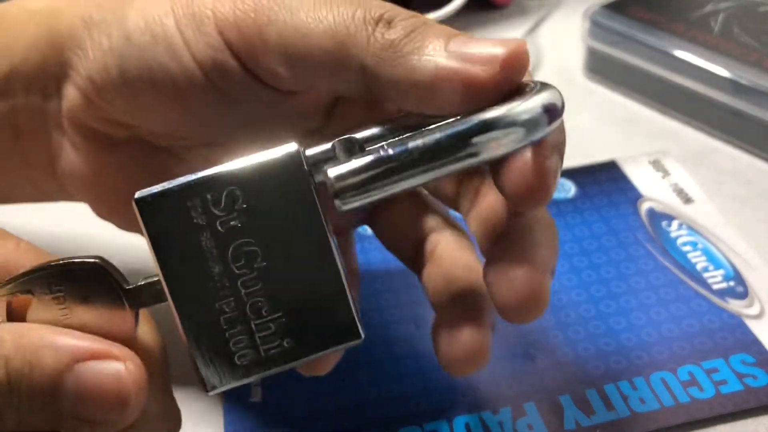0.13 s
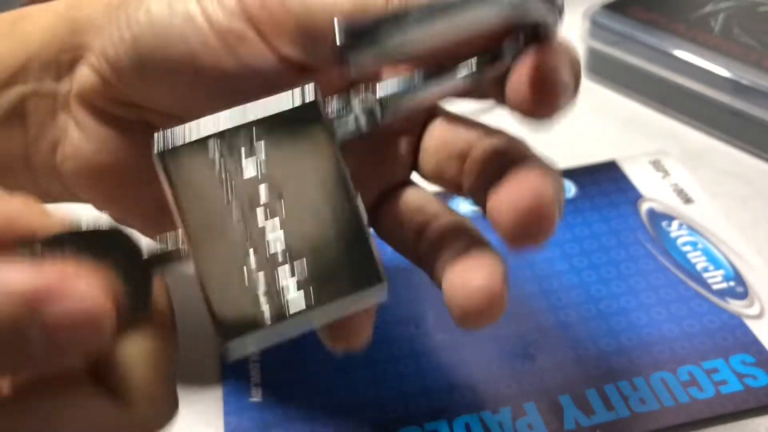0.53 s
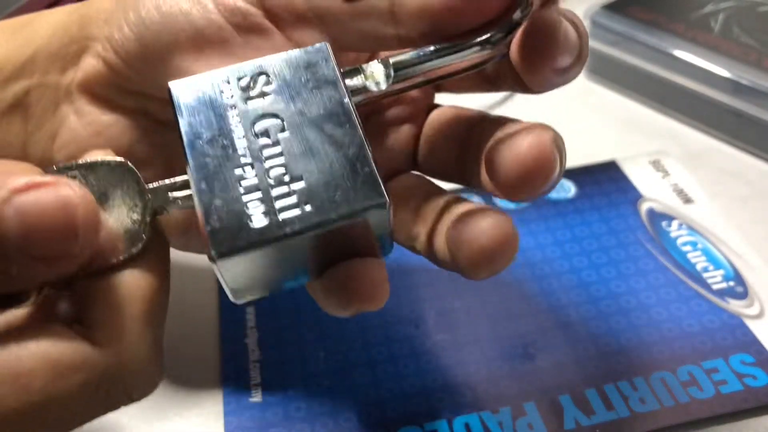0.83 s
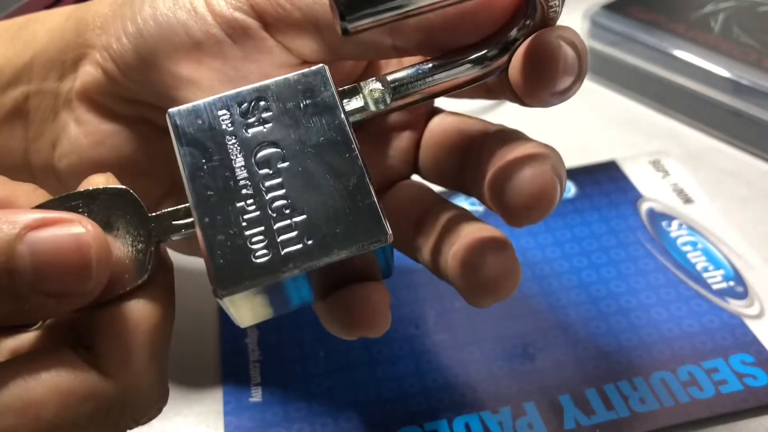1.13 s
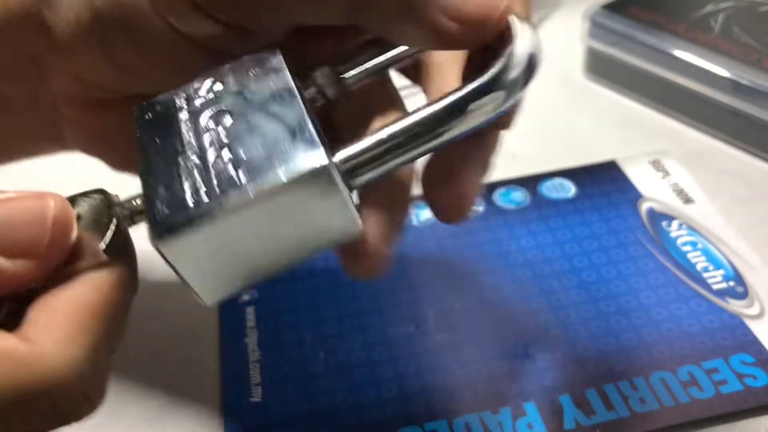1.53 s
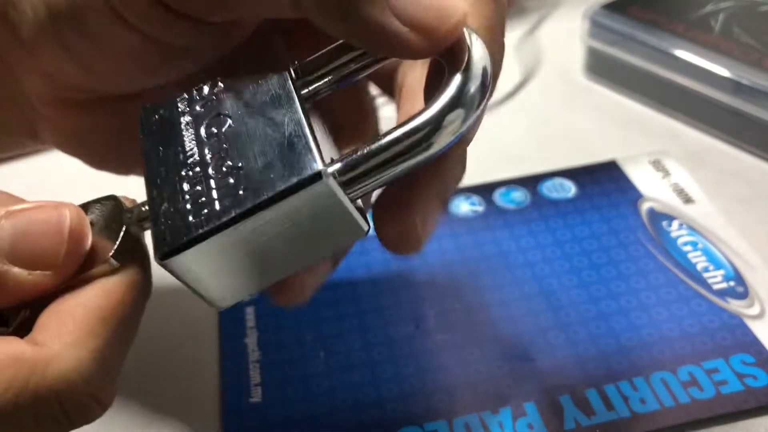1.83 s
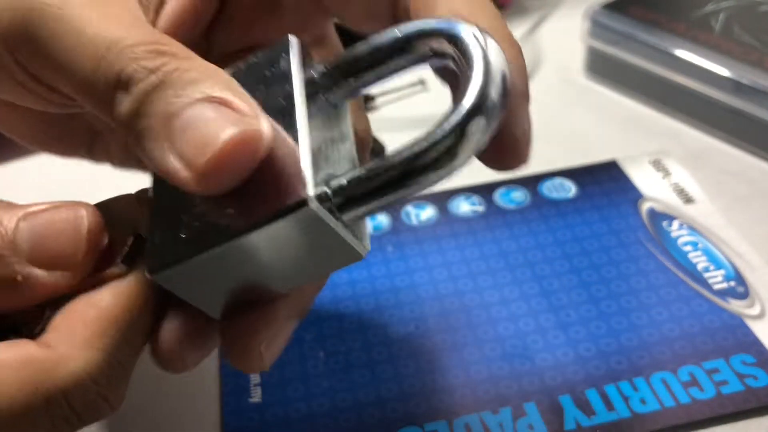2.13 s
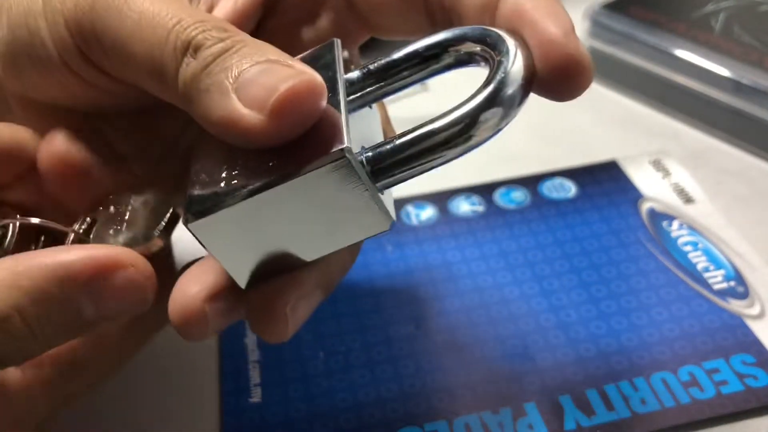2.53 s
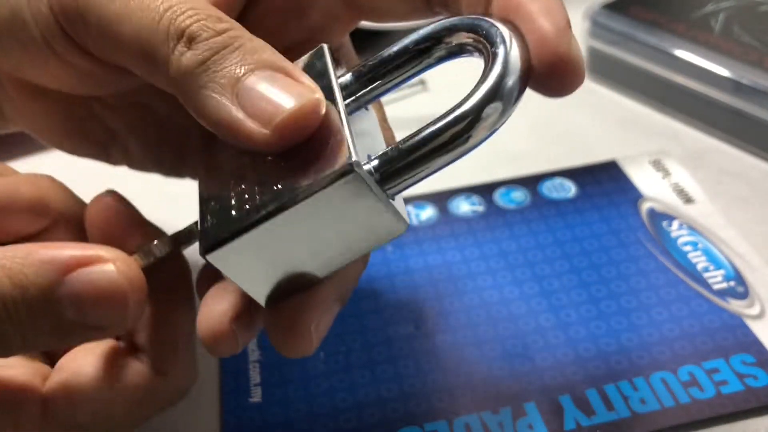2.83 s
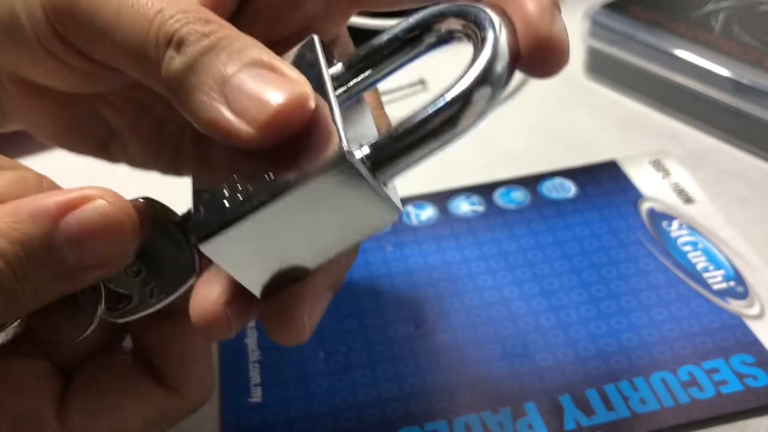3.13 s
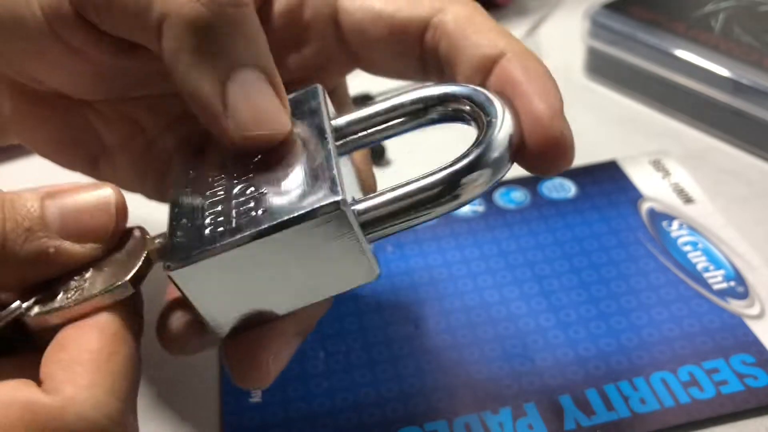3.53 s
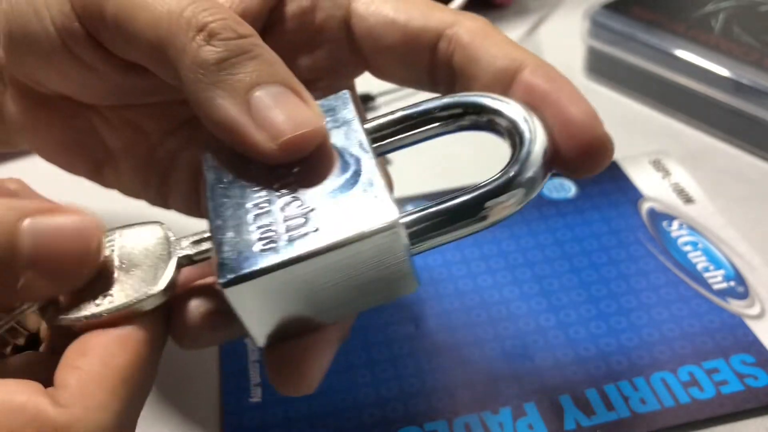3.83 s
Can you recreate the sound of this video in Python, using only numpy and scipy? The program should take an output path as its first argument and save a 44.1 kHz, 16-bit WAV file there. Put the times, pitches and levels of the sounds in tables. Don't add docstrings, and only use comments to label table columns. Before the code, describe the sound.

A steel padlock is handled close to a phone in a small, faintly reverberant room with low fan hum and soft hiss. Barely audible ticks come first; at 1.5-1.7 s the shackle snaps with loud, bright clacks. A sharp click follows at 2.2 s, thin key jingles at 2.4-2.5, a small tick at 2.8, a crisp ratcheting key slide at 3.05, then light key clicks and rattles from 3.4 to the end.

```python
import sys
import numpy as np
from scipy import signal
from scipy.io import wavfile
from scipy.ndimage import uniform_filter1d

SR = 44100
rng = np.random.default_rng(int(sys.argv[2]) if len(sys.argv) > 2 else 0)


def pcm_store(signal):
    levels = np.round(np.clip(np.atleast_2d(signal), -1, 1) * 32767)
    wavfile.write(sys.argv[1], SR, levels.astype(np.int16).T)


def makeup_ratio(level_db):
    decades = np.asarray(level_db, float) / 20
    return 10 ** decades


N = 176400


def evened(x):
    return x / np.sqrt(np.mean(x ** 2) + 1e-20)


def read(points, hz):
    f, value = np.transpose(points)
    return np.interp(np.log(hz + 1), np.log(f + 1), value)


def add(mix, start_s, sound):
    part = mix[round(start_s * SR):][:len(sound)]
    part += sound[:len(part)]


def noise(shape_db, patchy_db):
    real, imag, patches = rng.standard_normal((N // 512 + 5, 1025, 3)).T
    patches = uniform_filter1d(patches, size=16, axis=0)
    patches = evened(uniform_filter1d(patches, size=8, axis=1))
    spectra = (real + 1j * imag) * makeup_ratio(shape_db[:, None] + patchy_db * patches)
    return evened(signal.istft(spectra, nperseg=2048, noverlap=1536)[1][:N])


def air_and_hiss():
    # frequency in Hz, density in dB per Hz.
    air = [(22, -62), (55, -17.5), (96, -28.5), (135, -3), (205, -6.5), (430, -19), (1070, -20.5),
           (1650, -26)]
    # frequency in Hz, density in dB per Hz.
    hiss = [(1950, -31), (3200, -38), (5000, -46), (8000, -51), (13000, -52.5), (15700, -52.5),
            (16000, -64.5)]
    hz = np.fft.rfftfreq(2048, 1 / SR)
    return makeup_ratio(-47.5) * noise(read(air + hiss, hz), patchy_db=1.31)


def fan_hum():
    # centre in Hz, width in Hz, level in dB.
    bands = [(63, 24, -69.5), (137.3, 11, -58.5), (198.5, 30, -56), (287.8, 27, -60.5), (973, 68, -68.5),
             (7500, 300, -86)]
    t = np.arange(N) / SR
    hum = np.zeros(N)
    for hz, width_hz, db in bands:
        pole = np.exp(-np.pi * width_hz / SR)
        slow = signal.lfilter([1], [1, -2 * pole, pole * pole], rng.standard_normal((2, N)))
        carrier = np.exp(2j * np.pi * hz * t)
        hum += makeup_ratio(db) * evened(((slow[0] + 1j * slow[1]) * carrier).real)
    return hum


def causal(db):
    log_gain = np.log(makeup_ratio(np.maximum(db, -80)))
    log_gain = np.concatenate([log_gain, log_gain[-2:0:-1]])
    spectrum = np.exp(log_gain - 1j * signal.hilbert(log_gain).imag)
    return np.fft.ifft(spectrum).real[:len(db)]


def peaked(db, sound):
    loudest = uniform_filter1d(sound ** 2, size=44).max()
    return makeup_ratio(db) * sound / np.sqrt(6 * loudest)


def chatter(ms, spread=1):
    knocks_per_ms, knock_spread_db, rise_ms = 6.47, 4, 0.45
    chance, size, sign = rng.random((3, 2048))
    t_ms = np.arange(2048) * 1000 / SR
    knocks = (chance < knocks_per_ms * 1000 / SR) * np.sign(sign - .5)
    knocks *= makeup_ratio(-spread * knock_spread_db * np.log(size + 1e-2))
    knocks[0] = 6.5
    hold = np.clip(1.1 - (t_ms / ms) ** 2, 0, 1)
    return knocks * hold * np.minimum(0.11 + t_ms / rise_ms, 1)


def tick(db, centre_hz, ms):
    width_octaves = .3 * (1 + ms / 20)
    band_hz = np.fft.rfftfreq(512, 1 / SR)
    away = np.log2((band_hz + 1) / centre_hz) / width_octaves
    return peaked(db, np.convolve(chatter(ms, spread=.6), causal(-6.0 * away ** 2)))


def body_ticks():
    # start in seconds, peak in dB, centre in Hz, length in ms.
    ticks = [(.019, -47, 4060, 19), (.37, -49.5, 3900, 3), (2.018, -44.5, 3540, 27.5),
             (2.349, -43, 4800, 3), (2.3792, -49, 4560, 3), (2.40, -46, 5100, 2.5), (2.421, -46, 4500, 2),
             (2.452, -44, 4340, 7.8), (2.547, -51, 4470, 2), (2.76, -45, 4660, 4.2),
             (2.784, -51, 4650, 3.6), (2.892, -41.5, 4540, 3.9), (1.599, -46.5, 4290, 54),
             (1.5565, -26.5, 4316, 18), (3.574, -50, 2850, 3)]
    sound = np.zeros(N)
    for start_s, *touch in ticks:
        add(sound, start_s, tick(*touch))
    return sound


def modal_ring(modes, spot_hz, free):
    spot_db, spot_octaves, spot_db_per_octave = 13, 0.045, 5
    detune, grip_spread_db = .004, 2.5
    far_ring = 0.5
    hz, level, t60 = np.transpose(modes)[:, :, None]
    t = np.arange(8192) / SR
    phase, grip, shift = rng.random((3, *hz.shape))
    away = abs(np.log2(hz / spot_hz))
    near = np.exp(-(away / spot_octaves) ** 2)
    level = level - spot_db_per_octave * away + spot_db * near - grip_spread_db * grip
    t60 = t60 * max(free, .03) * (far_ring + (1 - far_ring) * near)
    turns = hz * (1 + detune * (shift - .5)) * t + phase
    ring = (makeup_ratio(level - 60 * t / t60) * np.sin(2 * np.pi * turns)).sum(0)
    return ring * np.minimum(t / 0.00023, 1) / np.linalg.norm(makeup_ratio(level))


def impact_crack(spot_hz):
    # frequency in Hz, level in dB.
    crack_colour = [(1500, -46), (3100, -0.5), (6000, 2), (12000, -3.5), (15700, -0.5), (16600, -4)]
    t, band_hz = np.arange(1024) / SR, np.fft.rfftfreq(512, 1 / SR)
    away = abs(np.log2((band_hz + 1) / spot_hz))
    colour = read(crack_colour, band_hz) - 0.51 * 5 * away
    burst = rng.standard_normal(1024) * makeup_ratio(-60 * t / 0.012)
    return np.convolve(burst, causal(colour))


def strike(modes, crack_db, db, spot_hz, ms, free):
    body = modal_ring(modes, spot_hz, free)
    add(body, 0, makeup_ratio(crack_db + 11.5 * (0.22 - free)) * impact_crack(spot_hz))
    return peaked(db, signal.fftconvolve(chatter(ms), body))


def strikes(modes, crack_db, hits):
    sound = np.zeros(N)
    for start_s, *hit in hits:
        add(sound, start_s, strike(modes, crack_db, *hit))
    return sound


def loose_key():
    # frequency in Hz, level in dB, t60 in seconds.
    modes = [(2800, 5, 0.0452), (4834, -11, 0.22), (5070, -0.5, .07), (7490, -4, 0.096), (7760, -4, 0.1),
             (8700, -5.5, 0.069), (10300, -2, 0.087), (10750, 2.5, 0.055), (12470, 4.5, 0.072),
             (12800, -2, 0.088), (13630, -3, 0.1), (14200, -2, 0.11), (15210, -2, 0.1), (15500, -2, 0.11)]
    # start in seconds, peak in dB, struck spot in Hz,
    # chatter in ms, free ring from 0 to 1.
    rattle = [(0.282, -46, 8700, 2.1, 0.19), (0.5, -43, 7500, 3.7, 0.45), (.502, -52, 4770, 1.7, 1),
              (1.295, -47, 15300, 2.3, .15), (2.311, -57, 7500, 3, .5), (2.349, -54, 12800, 40, 0.59),
              (2.3495, -54, 7500, 4.3, .4), (2.40, -49, 7800, 2, 0.43), (2.4142, -31, 9200, 0.81, 0.035),
              (2.416, -46, 12800, 23, 0.7), (2.453, -39, 7620, 3, 0.51), (2.455, -47, 12800, 3, .4),
              (2.456, -53, 15400, 5, .5), (2.512, -45, 9000, 0.76, .05), (2.5184, -30, 14600, 1.5, 0.26),
              (2.521, -41, 12800, 3, 0.34), (2.526, -41, 9150, 2.3, 0.05), (2.958, -46.5, 12500, 1.9, .2)]
    # start in seconds, peak in dB, struck spot in Hz,
    # chatter in ms, free ring from 0 to 1.
    slide = [(3.367, -25.5, 12800, 2.4, 0.18), (3.368, -26, 8700, 4.8, 0.33), (3.566, -50, 4950, 0.94, .2),
             (3.572, -46, 4900, 2.1, 0.58), (3.5809, -36.5, 13600, 2.3, 0.12),
             (3.645, -44, 7700, 5.5, 0.18), (3.649, -48, 13700, 4.6, 0.38), (3.65, -43.5, 4830, 6, 0.68),
             (3.668, -38, 13200, 1.2, 0.46), (3.681, -27.5, 14300, 3.4, 0.45),
             (3.6815, -31.5, 7500, 1.5, 0.29), (3.688, -37, 7630, 5.7, 0.23),
             (3.692, -40, 12500, 5.8, 0.27), (3.814, -52, 15500, 2.9, .2), (3.872, -48, 7500, 9, .3),
             (3.8815, -31, 12660, 2, 0.65), (3.882, -34, 7500, 1.5, 0.58), (3.886, -52, 4830, 2, 0.59),
             (3.889, -42, 8440, 1.3, .3), (3.897, -48.5, 7450, 19, 0.33), (3.921, -43, 14300, 1, 0.1),
             (3.9253, -38, 7500, 1.6, 0.23), (3.926, -44, 12460, 2, 0.55), (3.936, -40, 15500, 7.6, 0.36),
             (3.938, -45.5, 7500, 38, 0.4), (3.94, -43, 13630, 14, 0.6), (3.943, -49, 10300, 18, 0.37),
             (3.962, -45, 12460, 1.4, .4), (3.974, -49, 12460, 1.8, 0.27), (3.986, -51, 15500, 12, .4),
             (3.986, -48, 2800, 8, 0.36)]
    return strikes(modes, -4.5, slide + rattle)


def shackle():
    # frequency in Hz, level in dB, t60 in seconds.
    modes = [(2150, -11.5, 0.028), (3245, -9, 0.033), (4900, -19, 0.03), (5890, -10.5, 0.087),
             (5990, -7, 0.06), (6300, -8, .04), (8200, -13.5, .02), (10500, -8.5, .04), (10960, 1.5, 0.05),
             (11230, 0.5, 0.05), (11500, 0, .045), (12200, -1.5, 0.034), (14910, -4, .04),
             (15500, -5, 0.057)]
    # start in seconds, peak in dB, struck spot in Hz,
    # chatter in ms, free ring from 0 to 1.
    hits = [(1.337, -46.5, 3260, 2.6, 0.1), (1.5065, -31, 5700, 5.2, 0.34), (1.5145, -17.5, 3320, 7.3, 0),
            (1.5143, -7.5, 5840, 1.2, 0.19), (1.5165, -17, 14900, 3, .2), (1.519, -14, 11480, 3, 0.46),
            (1.542, -30, 4990, 3, 0.3), (1.546, -30, 6020, 8.7, 0.3), (1.5544, -3.5, 5956, 2, 0.53),
            (1.5542, -11, 10960, 2.1, 0.3), (1.5545, -17, 15420, 1.55, 0.4),
            (1.5638, -9.5, 8200, 0.93, 0.33), (1.5672, -17, 11500, 2.2, 0.3), (1.589, -27, 9060, 1.8, 0.14),
            (1.6385, -35, 6050, 2, .2), (1.6942, -13.5, 6286, 4, 0.5), (1.696, -13.5, 11580, 5, 0.35),
            (1.697, -18, 14940, 4.9, 0.02), (1.697, -17, 3100, 1.7, 0.55), (2.2335, -22.5, 3985, 3.2, 0.27),
            (2.235, -31.5, 2150, 1.8, 0.7), (2.236, -9.5, 11300, 2, 0.14), (2.2375, -23, 15400, 1.2, 0.2),
            (2.239, -22, 6070, 2, 0.1), (2.5817, -36.5, 6300, 0.89, 0.18), (2.582, -55, 11050, 1, 0.18),
            (2.824, -24.5, 11000, 1.5, 0.04), (3.5023, -29.5, 9500, 1, 0.04)]
    return strikes(modes, -12.5, hits)


def seated_key():
    # frequency in Hz, level in dB, t60 in seconds.
    modes = [(5630, -4, .04), (7700, 1.5, .1), (7800, 2.5, .07), (8200, -2, 0.09), (8820, -15, .05),
             (10320, -4, .06), (10900, -2.5, .06), (12000, -0.5, .06), (12540, 1.5, .06), (12960, 1, .07),
             (13470, 5, 0.11), (13700, 0, .07), (15207, 3.5, 0.089), (15480, 4.5, .07)]
    # start in seconds, peak in dB, struck spot in Hz,
    # chatter in ms, free ring from 0 to 1.
    hits = [(3.0174, -51.5, 11500, 1.5, .05), (3.039, -47, 12900, 9, 0.2), (3.0449, -34.5, 2600, 2, 0),
            (3.049, -15.5, 7940, 4.6, 0.2), (3.051, -22, 15280, 4, 0.4), (3.0545, -9.5, 15200, 2.6, 0.1),
            (3.0579, -10, 15200, 1.8, 0.5), (3.0563, -13.5, 7660, 4.4, 0.3),
            (3.0608, -9.5, 15100, 1.7, 0.3), (3.063, -8, 13620, 2, 0.3), (3.0641, -14, 10300, 2, 0.5),
            (3.068, -14, 15500, 2, 0.3), (3.0716, -10.5, 15320, 1.32, 0.19),
            (3.073, -19.5, 10550, 4.6, 0.4)]
    return strikes(modes, -1.5, hits)


def walls(x):
    # frequency in Hz, t60 in seconds.
    decay = [(2000, 0.43), (6000, 0.3), (11000, 0.28), (15500, .19)]
    taps = np.zeros(SR // 2)
    at = np.arange(0, len(taps) - 20, 20)
    taps[at + rng.integers(0, 20, len(at))] = rng.choice([-1., 1.], len(at))
    hz, t, spectra = signal.stft(taps, SR, nperseg=256)
    spectra = spectra * makeup_ratio(-60 * t / read(decay, hz)[:, None])
    tail = signal.istft(spectra, SR, nperseg=256)[1]
    out = np.zeros(N)
    add(out, 0.0081, signal.fftconvolve(x, tail / np.linalg.norm(tail)))
    return makeup_ratio(-20.5) * out


def scene():
    tone = air_and_hiss() + fan_hum()
    lock = body_ticks() + loose_key() + shackle() + seated_key()
    return (lock + walls(lock) + tone)[None]


def low_pass(x):
    return signal.sosfilt(signal.butter(12, 16970, fs=SR, output="sos"), x)


def record(dry):
    # frequency in Hz, gain in dB.
    mic_top = [(0, 0), (15750, 0), (16000, -18), (16800, -26), (17100, -80), (SR / 2, -80)]
    hz, db = np.transpose(mic_top)
    band_limit = signal.firwin2(511, hz, makeup_ratio(db), fs=SR)
    mix = signal.oaconvolve(dry, band_limit[None], "same")
    return low_pass(mix)


dry = scene()
out = record(dry)
pcm_store(out)
```